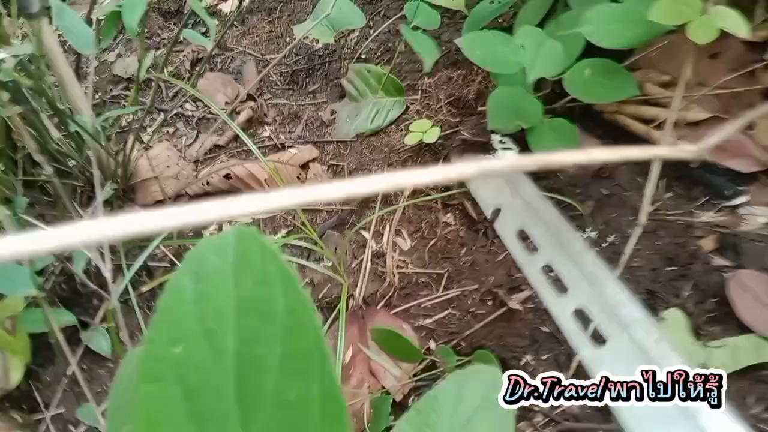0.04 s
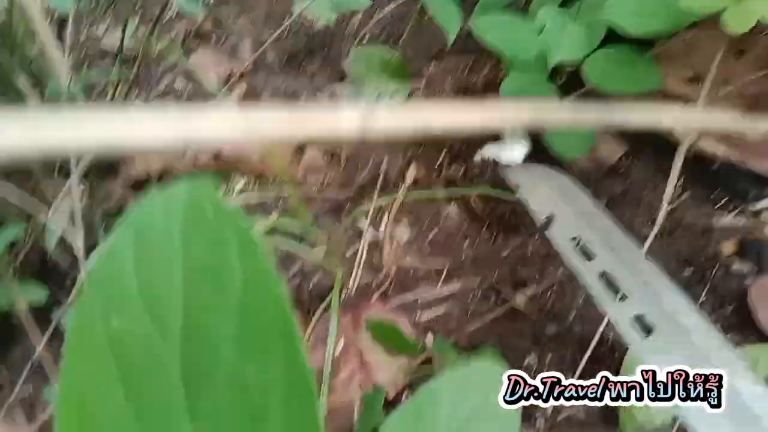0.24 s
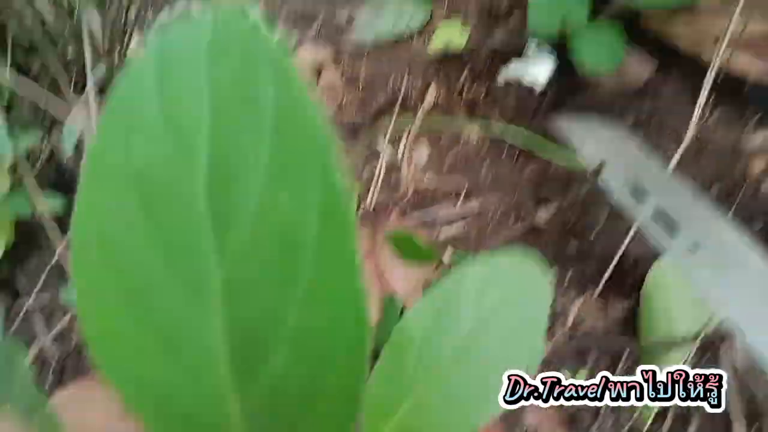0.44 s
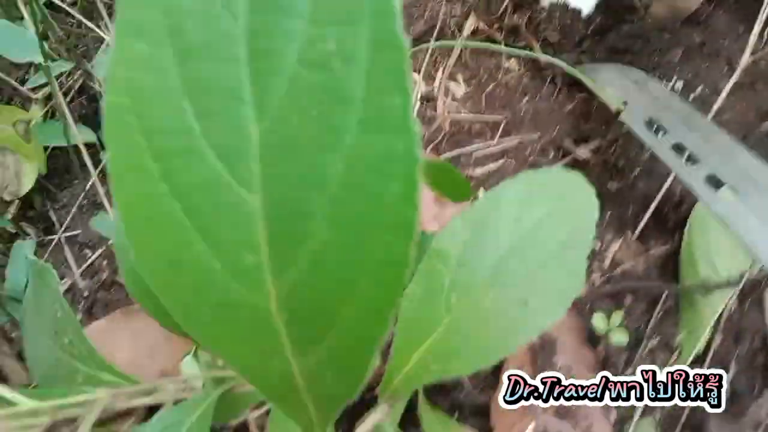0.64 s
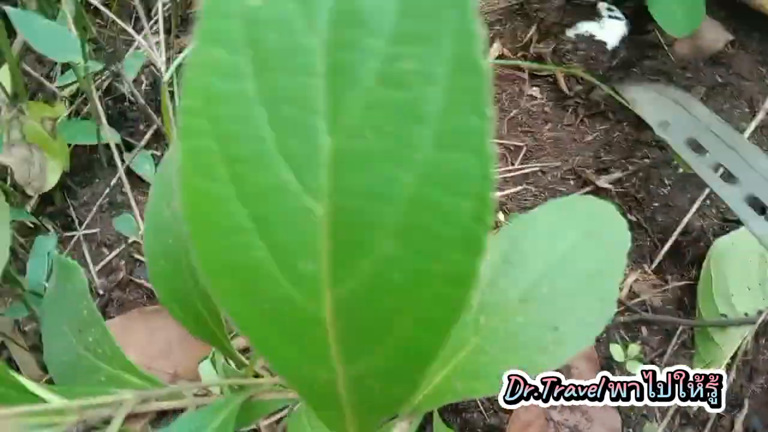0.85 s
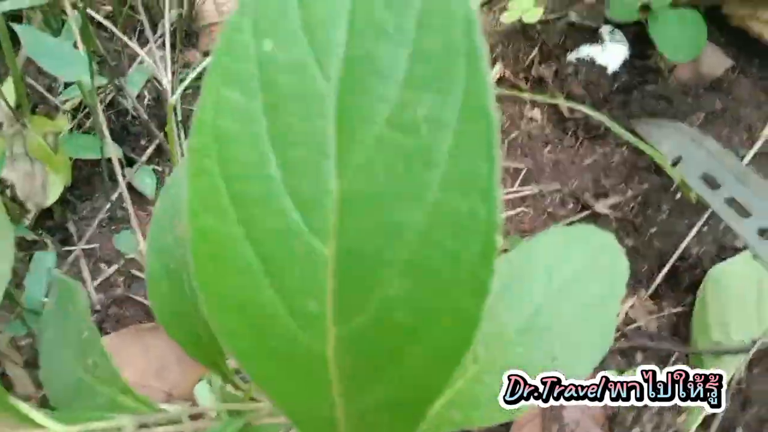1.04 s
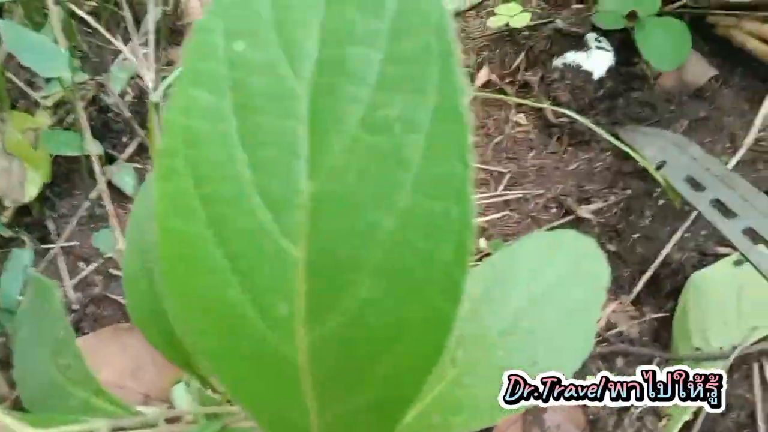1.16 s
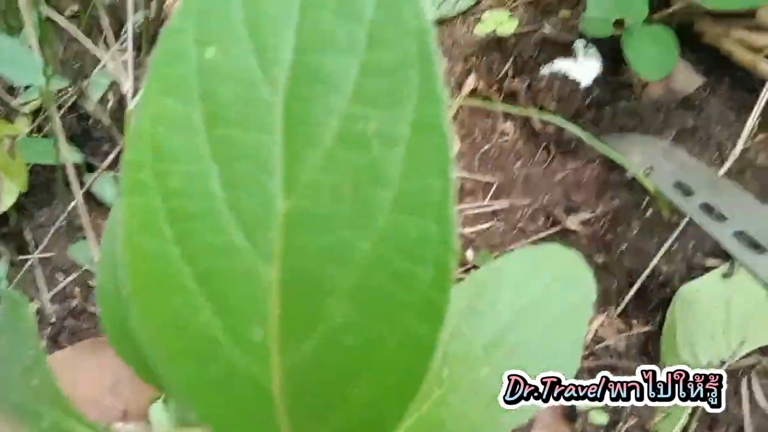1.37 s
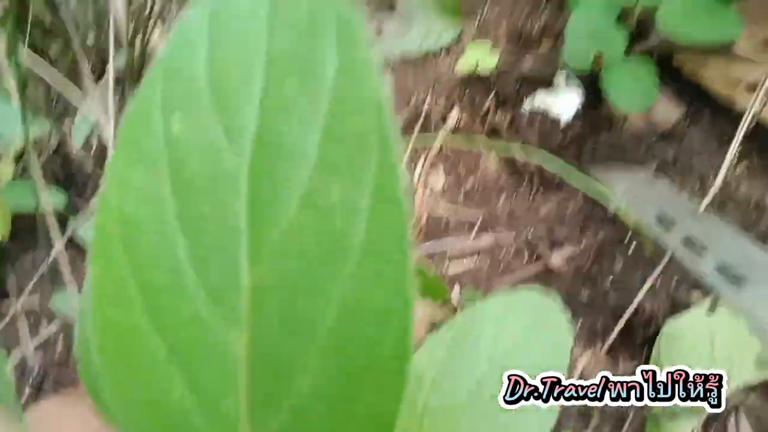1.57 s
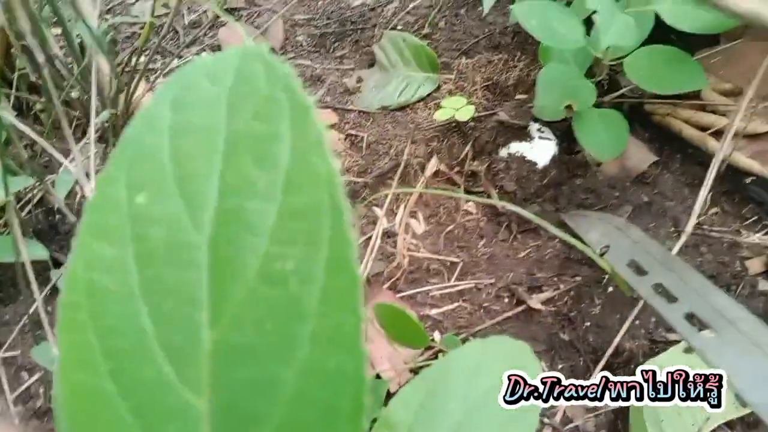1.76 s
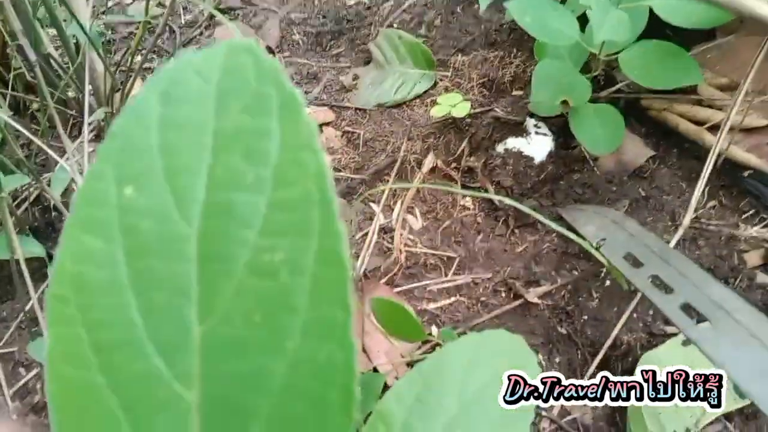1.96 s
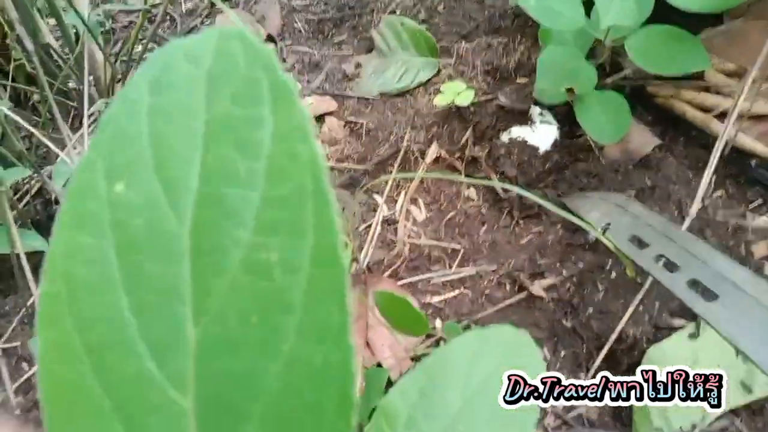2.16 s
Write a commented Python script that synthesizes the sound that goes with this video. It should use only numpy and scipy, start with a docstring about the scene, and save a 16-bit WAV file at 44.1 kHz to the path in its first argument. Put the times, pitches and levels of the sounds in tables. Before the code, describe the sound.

Leafy forest plants rustle right by the microphone, with stalks knocking and a few sharp snaps. After about a second the rustle eases, leaving a clicking twig, one hissing leaf and small dry scuffs over a faint low rumble.

```python
"""Leaves rustle as undergrowth is pushed aside close by: countless tiny slips of leaf on leaf,
over the duller scrape of stalks and litter. Stalks knock, thin stems snap and single leaves brush
past; then twigs click, one leaf slides off with a swelling hiss, a dry stalk is scuffed and a
brittle one crunches. Under it lie a low rumble and a faint hiss; a limiter catches the sharpest snaps."""
import sys
import numpy as np
from scipy import signal
from scipy.fft import rfft, irfft, next_fast_len
from scipy.io import wavfile
from scipy.ndimage import uniform_filter1d, minimum_filter1d, map_coordinates

SR = 44100
rng = np.random.default_rng(int(sys.argv[2]) if len(sys.argv) > 2 else 0)


def wrap_up_sound(samples):
    """Save the sound to the file named by the first command line argument, as 16-bit audio."""
    columns = np.atleast_2d(samples).T
    # keep every value between -1 and 1, then stretch to whole-number steps
    tamed = np.clip(columns, -1, 1)
    steps = np.round(tamed * 32767).astype(np.int16)
    wavfile.write(sys.argv[1], SR, steps)


N = 97020
CRACK_T60_S = 0.005  # a t60 is the time a sound takes to fade by 60 dB


def amp(db):
    """Turn decibels into a gain."""
    return 10 ** (np.asarray(db) / 20)


def unit(x):
    """Scale to an average (rms) size of 1."""
    return x / np.sqrt(np.mean(x ** 2) + 1e-20)


def clock():
    """The time of each sample in seconds."""
    return np.arange(N) / SR


def curve(rows):
    """Join (time, value) rows with straight lines."""
    return np.interp(clock(), *np.transpose(rows))


def wobble(rate):
    """A smooth curve through rate random values a second."""
    return map_coordinates(rng.standard_normal(int(N * rate / SR) + 4), [clock() * rate])


def colour(x, tone, tilt_db=0):
    """Give x a tone; a positive tilt (dB per octave) brightens it above about 1 kHz."""
    size = 4096
    octaves = np.log2(np.fft.rfftfreq(size, 1 / SR) + 1)
    hz, db = np.transpose(tone)
    gain = amp(np.interp(octaves, np.log2(hz), db) + tilt_db * np.maximum(octaves, 10))
    # build the filter so that nothing sounds before its cause
    cepstrum = irfft(np.log(gain / gain.max() + 1e-6))[:size // 2]
    cepstrum[1:] *= 2
    response = irfft(np.exp(rfft(cepstrum, size)))
    power = np.mean(np.abs(rfft(response)) ** 2 * (2 ** octaves < TOP_HZ))
    return signal.fftconvolve(x, response / np.sqrt(power))[:N]


def ring(x, t60):
    """The ring that x leaves behind, as a fading tail of noise."""
    t = np.arange(SR // 4) / SR
    tail = rng.standard_normal(len(t)) * amp(-60 * t / t60)
    return signal.fftconvolve(x, tail / np.linalg.norm(tail))[:N]


def shifting_ring(x, t60, rate):
    """Leaves move, so the ring hands over to a new one rate times a second."""
    place = clock() * rate
    fades = (np.cos(np.pi / 2 * np.clip(place - k, -1, 1)) for k in range(int(place[-1]) + 2))
    return sum(ring(x * fade, t60) for fade in fades)


def ring_notes(x, notes):
    """x sets an object's own few notes ringing."""
    t = np.arange(SR // 4) / SR
    response = sum(amp(db) * unit(np.cos(2 * np.pi * hz * t) * amp(-60 * t / t60))
                   for hz, db, t60 in notes)
    return signal.fftconvolve(x, response / np.sqrt(len(t)))[:N]


def onset(age, rise_s=0.0003):
    """Fibres give way within a fraction of a millisecond."""
    return 1 - np.exp(-age / rise_s)


def friction(slips_per_s=3500, spread_db=2.5, hiss=0.48):
    """Countless tiny slips of uneven size over a smooth hiss."""
    slips = rng.random(N) < slips_per_s / SR
    sizes = amp(spread_db * np.minimum(rng.exponential(size=N), 4)) * rng.choice([-1, 1], N)
    return unit(unit(slips * sizes) + hiss * rng.standard_normal(N))


def crackle(flicks_per_s=110):
    """Now and then a leaf edge catches and flicks free."""
    return unit((rng.random(N) < flicks_per_s / SR) * rng.uniform(-0.13, 1, N))


def patchy(x, depth_db, patch_hz=311, patch_s=0.06076):
    """The tone keeps shifting as other leaves come into contact."""
    size = 512
    hz, t, spectra = signal.stft(x, SR, nperseg=size)
    place = np.meshgrid(hz / patch_hz, t / patch_s, indexing="ij")
    patches = map_coordinates(rng.standard_normal((size // 2, size // 2)), place, mode="wrap")
    return signal.istft(spectra * amp(depth_db * patches), SR, nperseg=size)[1][:N]


def rustle(levels, tone, flutter_db, ring_db, ring_t60, patchy_db, fade_db_per_s=104):
    """Friction that flutters as leaves catch and let go, fading outside the listed times."""
    grains = (friction() + amp(-9) * crackle()) * amp(flutter_db * wobble(71.2))
    ringing = amp(ring_db) * shifting_ring(grains, ring_t60, rate=10.24)
    body = patchy(grains + ringing, patchy_db)
    outside_s = np.abs(clock() - np.clip(clock(), levels[0][0], levels[-1][0]))
    return unit(colour(body, tone)) * amp(curve(levels) - fade_db_per_s * outside_s)


def strokes(rows, tone, ring_db, ring_t60):
    """Short rubs that set a plant ringing; each swells and fades 20 dB in its rise and fall times."""
    out = np.zeros(N)
    for peak_s, db, rise, fall, tilt_db in rows:
        t = clock() - peak_s
        rub = colour(friction(), tone, tilt_db) * amp(db - 20 * np.maximum(-t / rise, t / fall))
        out += rub + amp(ring_db) * ring(rub, ring_t60)
    return out


# how the rubbing swells and fades (time [s], relative level [dB])
RUB_LEVELS = [(0, -36), (.14, -34.5), (.18, -39.5), (.23, -31.5), (.28, -39.5), (.33, -29.5), (.48, -30),
              (.56, -29), (.63, -35), (.685, -30.5), (.72, -39.5), (.78, -33.5), (.88, -34.5), (.98, -34.5),
              (1.035, -50.5), (1.16, -57), (1.25, -52.5), (1.33, -50.5), (1.36, -55)]
# its bright tone (frequency [Hz], level [dB])
RUB_TONE = [(500, -24.5), (1800, -21), (2600, -16), (3400, -9.5), (4200, -13.5), (5200, 1.5), (6600, 0),
            (8500, -6), (11000, -9), (13000, -2.5), (15200, -2)]


def rubbing_leaves():
    """Leaves rub on each other in a dense, bright rustle."""
    return rustle(RUB_LEVELS, RUB_TONE, flutter_db=1.76, ring_db=-2, ring_t60=0.014, patchy_db=2.6)


# how the scraping swells and fades (time [s], relative level [dB])
SCRAPE_LEVELS = [(0, -42.5), (.04, -46), (.16, -52.5), (.22, -42), (.28, -54), (.35, -39), (.45, -36.5),
                 (.58, -33.5), (.66, -40.5), (.73, -47), (.78, -39), (.86, -41.5), (.89, -48), (.93, -42),
                 (1.0, -48.5), (1.04, -68.5), (1.17, -67), (1.25, -55), (1.36, -67.5)]
# its duller tone (frequency [Hz], level [dB])
SCRAPE_TONE = [(200, -24.5), (450, -26), (600, -10), (850, -4), (1300, 2.5), (1750, -1), (2200, -6.5),
               (2800, -3.5), (3400, 1), (4300, -12), (8000, -17.5)]


def scraping_stalks():
    """Stalks and leaf litter scrape, ringing more than the leaves do."""
    return rustle(SCRAPE_LEVELS, SCRAPE_TONE, flutter_db=0.76, ring_db=6.5, ring_t60=0.026, patchy_db=1)


# how loud the rumble is (time [s], level [dB])
RUMBLE_LEVELS = [(0, -66), (.2, -59.5), (.26, -59.5), (.4, -56.5), (.5, -66), (.72, -74), (.8, -63),
                 (.97, -61), (1.05, -66.5), (1.17, -67.5), (1.37, -62), (1.6, -69), (2.0, -71), (2.07, -66),
                 (2.2, -70)]
# tones of the rumble and the hiss (frequency [Hz], level [dB])
RUMBLE_TONE = [(20, -23), (50, -30), (80, -8.5), (108, 2.5), (150, -6), (300, -17), (600, -33), (2000, -51)]
HISS_TONE = [(100, 1), (500, -4), (1600, 0), (2300, -9), (4200, -9.5), (5600, -0.5), (7400, -9), (7800, 8),
             (9000, 0.5), (10500, 2), (11000, -17), (15500, -14)]


def background():
    """A low uneven rumble and a faint steady hiss."""
    rumble = unit(colour(rng.standard_normal(N), RUMBLE_TONE)) * amp(curve(RUMBLE_LEVELS))
    return rumble + amp(-63) * colour(rng.standard_normal(N), HISS_TONE)


# knocks on stalks (time [s], level [dB], pitch [Hz], half length [cycles])
KNOCKS = [(.008, -37.5, 360, 0.7), (.4370, -17, 1400, 0.63), (0.5777, -26.5, 1550, 1.6),
          (.6755, -31, 1010, 0.39), (0.8264, -12, 2170, 0.76), (0.923, -22, 1760, 0.85),
          (1.2176, -31.5, 1860, 1.08), (2.0868, -44.5, 2000, 0.99)]


def knocking_stalks():
    """A stalk is tapped or springs back from a snap: a swing or two, then a woody ring."""
    out = np.zeros(N)
    for start, db, hz, width in KNOCKS:
        cycles = (clock() - start) * hz - 1
        tap = amp(db) * np.sin(2 * np.pi * cycles) * np.exp(-(cycles / width) ** 2)
        out += tap + amp(-4.5) * ring(tap, t60=0.12)
    return out


# how loud the broad leaf is (time [s], level [dB])
DRAG_LEVELS = [(.2, -70), (.24, -54), (.32, -62), (.36, -44), (.45, -41.5), (.6, -45.5), (.68, -53.5),
               (.72, -65), (.78, -62.5), (.83, -67)]
# its low tone (frequency [Hz], level [dB])
DRAG_TONE = [(150, -22), (300, -21), (460, -22.5), (520, 2.5), (700, 2), (900, -6.5), (1300, -6.5),
             (1750, -6), (3000, -19)]


def dragging_leaf():
    """A broad leaf drags along during the hardest push."""
    return rustle(DRAG_LEVELS, DRAG_TONE, flutter_db=3, ring_db=-1.5, ring_t60=0.05, patchy_db=-0.56)


# breaking stems (time [s], level [dB], tail against crack [dB], tail t60 [s], tilt [dB per octave])
SNAPS = [(0.2164, -19, -1, .025, 6.5), (.341, -30.5, -20.5, 0.0082, 4), (0.357, -20.5, -4.5, 0.088, -5.5),
         (0.4337, -12, -0.5, 0.014, 0), (0.4369, 8, -22, 0.026, 0), (0.5763, -1.5, -7, 0.031, -4),
         (0.642, -12, -7.5, 0.032, -5.5), (0.6617, -13.5, -12.5, 0.056, -5.5), (0.6673, -17.5, 0, 0.025, 0),
         (0.6758, 1, -13, 0.021, -2), (0.852, -26, -11.5, .02, -12), (0.8681, -25, -5, .015, -4),
         (0.8772, -20.5, -10, .015, -0.5), (0.962, -24, -2.5, 0.023, 0.5), (.985, -25, -10, 0.017, -11)]
# their sharp tone (frequency [Hz], level [dB])
SNAP_TONE = [(60, -38), (400, -33), (700, -34), (1400, -28.5), (2500, -20), (3300, -10), (4200, -11.5),
             (5300, -1), (6400, 5.5), (8500, -4), (11000, -0.5), (14000, 8.5), (15500, 2)]


def snapping_stems():
    """Each stem breaks with one hard crack and a short splintering tail."""
    out = np.zeros(N)
    for start, db, tail_db, t60, tilt_db in SNAPS:
        age = np.maximum(clock() - start, 0)
        crack = rng.choice([-1, 1], N) * amp(-60 * age / CRACK_T60_S)
        tail = rng.standard_normal(N) * amp(tail_db - 60 * age / t60)
        out += amp(db) * colour((crack + tail) * onset(age), SNAP_TONE, tilt_db)
    return out


# passing leaves (peak time [s], level [dB], rise [s], fall [s], tilt [dB per octave])
BRUSHES = [(0.307, -31, 0.11, 0.07, 1.5), (0.406, -27, 0.0096, 0.029, 4), (0.924, -29, 0.04, 0.029, 5),
           (0.976, -38.5, 0.032, 0.049, -0.5), (1.095, -54.5, 0.12, 0.077, 3),
           (1.222, -51, 0.02, 0.036, -7.5), (1.285, -43, .01, 0.041, 1.5), (1.40, -45.5, 0.027, 0.084, 0.5),
           (1.868, -61, 0.019, 0.03, 1), (2.058, -47.5, 0.019, 0.024, 0.5),
           (2.0735, -55, 0.003, 0.047, -3.5), (2.115, -57.5, .008, 0.0088, -4)]
# their airy tone (frequency [Hz], level [dB])
BRUSH_TONE = [(200, -43), (700, -9.5), (1500, -4), (2600, -3.5), (3400, -2.5), (4200, -9.5), (5200, 0.5),
              (7000, 5), (9000, -2), (11500, -3.5), (15000, 2)]


def brushing_leaves():
    """Single leaves brush past, each with one short rub."""
    return strokes(BRUSHES, BRUSH_TONE, ring_db=-2.5, ring_t60=0.086)


# twig clicks (time [s], level [dB])
CLICKS = [(1.2172, -41), (1.2695, -27), (1.2726, -10), (1.2762, -28), (1.2842, -27), (1.3162, -34.5),
          (1.7055, -52), (1.744, -49.5), (2.0722, -34)]
# their thin tone (frequency [Hz], level [dB])
CLICK_TONE = [(300, -22), (1000, -33), (1500, 0), (2000, -32), (2500, -24), (3000, -14), (3550, -13),
              (4100, -16), (5150, 2), (6000, -23), (7200, -0.5), (9000, 0), (10700, 6), (13000, 2),
              (15500, -12)]
# notes a twig rings with (pitch [Hz], level [dB], t60 [s])
TWIG_NOTES = [(1515, -13, 0.094), (2375, -14.5, 0.081), (3080, -23.5, 0.072), (3540, -23.5, 0.073),
              (5130, -10.5, 0.076), (7900, -17, .1)]


def clicking_twigs():
    """A dry twig ticks, and the blow makes it ring briefly."""
    out = np.zeros(N)
    for start, db in CLICKS:
        age = np.maximum(clock() - start, 0)
        burst = rng.choice([-1, 1], N) * onset(age) * amp(db - 60 * age / CRACK_T60_S)
        tick = colour(burst, CLICK_TONE)
        blow = np.linalg.norm(tick) * (np.arange(N) == round(start * SR))
        out += tick + ring_notes(blow, TWIG_NOTES) + amp(-3) * ring(tick, t60=0.036)
    return out


# how loud the sliding leaf is (time [s], level [dB])
SLIDE_LEVELS = [(1.36, -58), (1.40, -50.5), (1.467, -34), (1.471, -35.5), (1.49, -32), (1.51, -32.5),
                (1.519, -52), (1.545, -50), (1.575, -62.5)]
# its hissy tone (frequency [Hz], level [dB])
SLIDE_TONE = [(400, -31.5), (900, -28), (1650, -24), (2800, -23), (3300, -13), (4300, -31), (5500, -8),
              (7000, -15), (10000, -13), (11200, -24), (13000, -7.5), (14600, -4.5), (15500, -6.5)]


def sliding_leaf():
    """One leaf slides off with a hiss that swells, then drops away."""
    return rustle(SLIDE_LEVELS, SLIDE_TONE, flutter_db=2, ring_db=2.5, ring_t60=0.032, patchy_db=2)


# scuffs on a dry stalk (peak time [s], level [dB], rise [s], fall [s], tilt [dB per octave])
SCUFFS = [(1.654, -42.5, 0.0038, 0.018, 2.5), (1.672, -46.5, 0.015, 0.0081, -2.5),
          (1.693, -57, 0.02, 0.013, -6.5), (1.708, -50.5, 0.014, 0.0085, 10.5)]
# their dry tone (frequency [Hz], level [dB])
SCUFF_TONE = [(300, -35), (1400, -11), (2300, -13.5), (2800, -12.5), (3900, -1.5), (4600, -8), (5000, 4),
              (5500, -0.5), (6600, -3.5), (8000, 6.5), (11400, -5.5), (15500, -16)]
# notes the stalk rings with (pitch [Hz], level [dB], t60 [s])
STALK_NOTES = [(1400, -20, .06), (2490, -5.5, 0.038), (3110, -11.5, 0.077), (3800, -19.5, 0.045),
               (4250, -23, 0.04), (5090, -10, 0.03), (5860, -22, .05), (6780, -14, 0.06)]


def scuffed_stalk():
    """Quick rubs set a dry stalk ringing."""
    scuffs = strokes(SCUFFS, SCUFF_TONE, ring_db=-9.5, ring_t60=0.045)
    return scuffs + ring_notes(scuffs, STALK_NOTES)


# jolts of a brittle stalk (time [s], level [dB], tilt [dB per octave])
JOLTS = [(2.0532, -46, 13), (2.059, -43, 18), (2.0717, -40, 1)]
# notes it rings with (pitch [Hz], level [dB], t60 [s])
BRITTLE_NOTES = [(1400, -9, 0.035), (2035, 0, 0.023), (2270, -8, 0.035), (4740, -2, 0.021),
                 (5030, -2.5, 0.032), (5850, -4.5, 0.028), (6250, -14, 0.024)]


def crunching_stalk():
    """A brittle stalk gives way in quick jolts; only the hardest stirs its low, woody notes much."""
    out = np.zeros(N)
    highest_hz = BRITTLE_NOTES[-1][0]
    for start, db, tilt_db in JOLTS:
        age = np.maximum(clock() - start, 0)
        for hz, note_db, t60 in BRITTLE_NOTES:
            level = db + note_db + tilt_db * np.log2(hz / highest_hz)
            decay = amp(-60 * age / t60) + amp(-12.5 - 60 * age / 0.12)  # plus a softer, longer ring
            out += amp(level) * np.sin(2 * np.pi * hz * age) * decay * onset(age)
    return out


def scene():
    """Mix all sounds in one channel; the snaps scatter faintly off the plants around."""
    snaps = snapping_stems()
    mix = amp(1) * rubbing_leaves() + amp(-0.5) * scraping_stalks() + dragging_leaf() + sliding_leaf()
    mix += snaps + amp(-11) * ring(snaps, t60=0.1)
    mix += clicking_twigs() + knocking_stalks() + crunching_stalk()
    mix += scuffed_stalk() + brushing_leaves() + background()
    return mix[None]


TOP_HZ, EDGE_HZ = 15750, 300
LIMIT_S, LIMIT_PEAK = 0.0007, 1.15


def record(dry):
    """The highest treble is cut off, and a fast limiter turns down the loudest peaks."""
    size = next_fast_len(N + SR // 2)
    keep = np.clip((TOP_HZ - np.fft.rfftfreq(size, 1 / SR)) / EDGE_HZ + .5, 0, 1)
    x = irfft(rfft(dry, size) * keep, size)[:, :N]
    width = int(LIMIT_S * SR)
    gain = LIMIT_PEAK / np.maximum(np.abs(x), LIMIT_PEAK)
    return x * uniform_filter1d(minimum_filter1d(gain, width), width)


dry = scene()
out = record(dry)
wrap_up_sound(out)
```